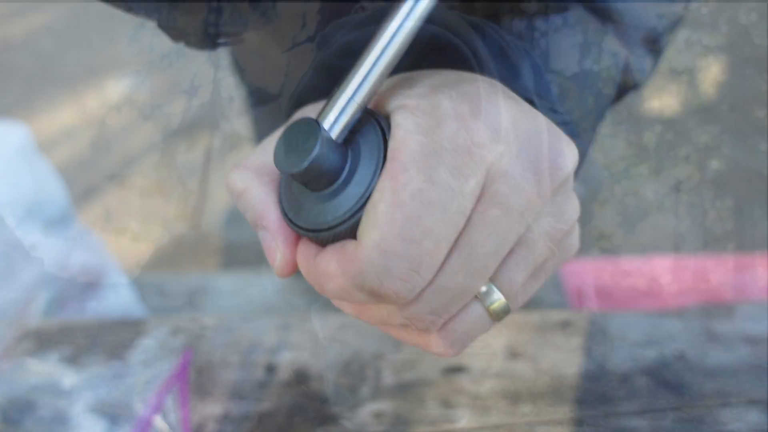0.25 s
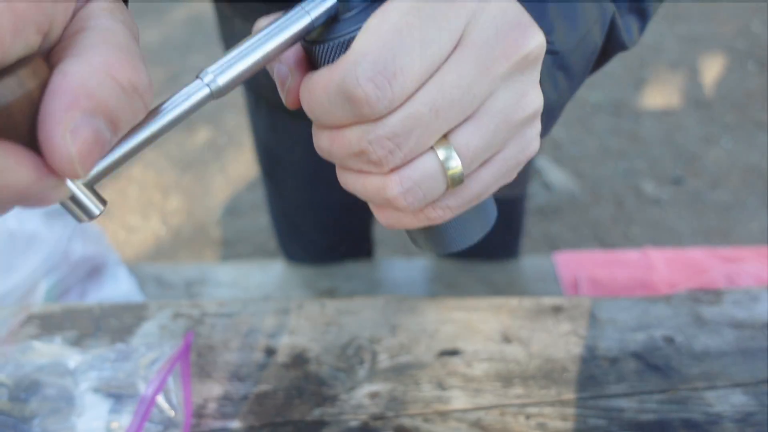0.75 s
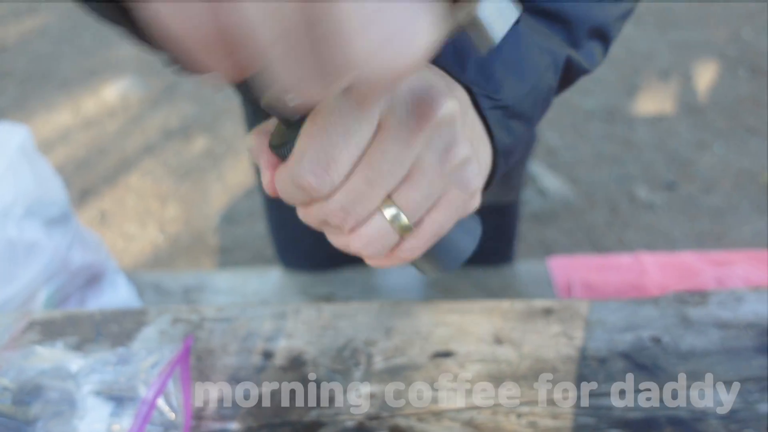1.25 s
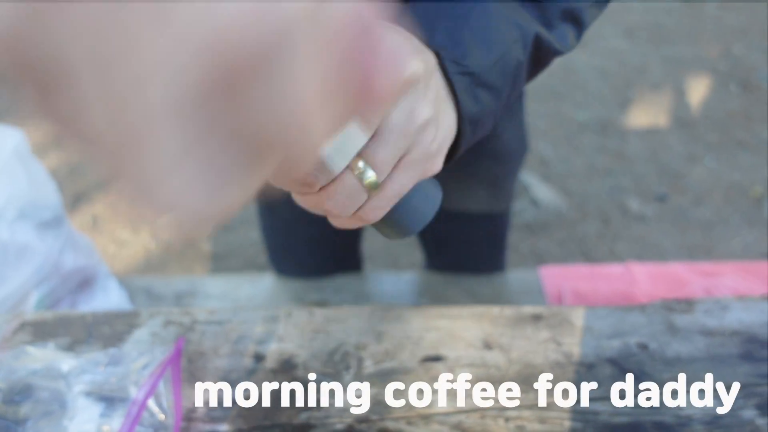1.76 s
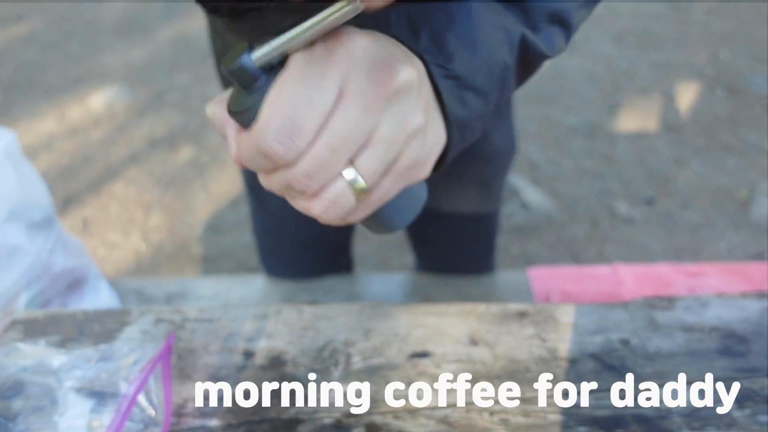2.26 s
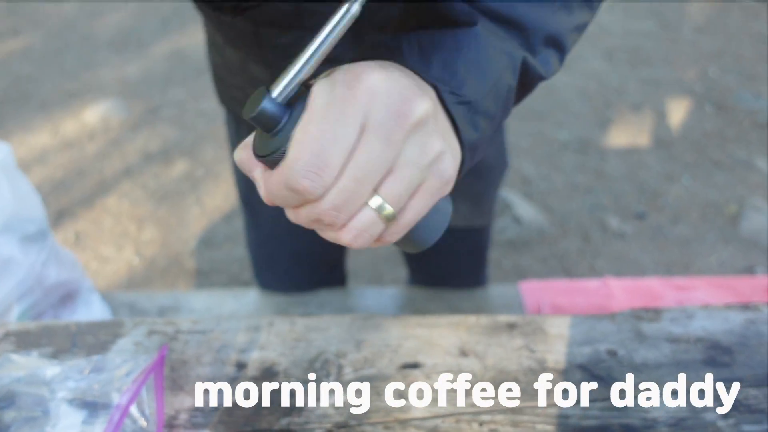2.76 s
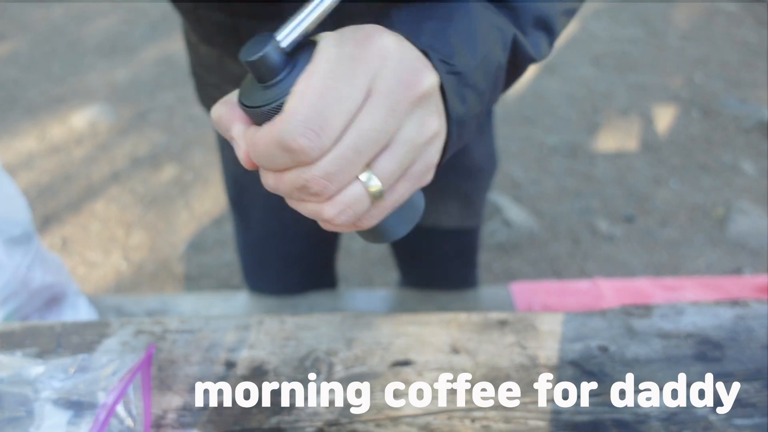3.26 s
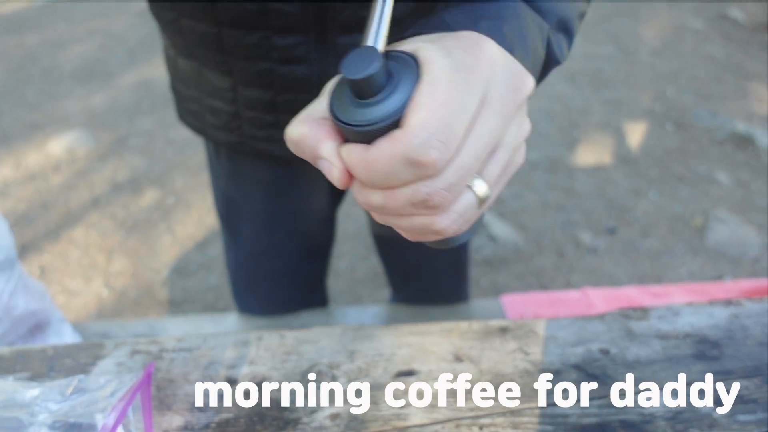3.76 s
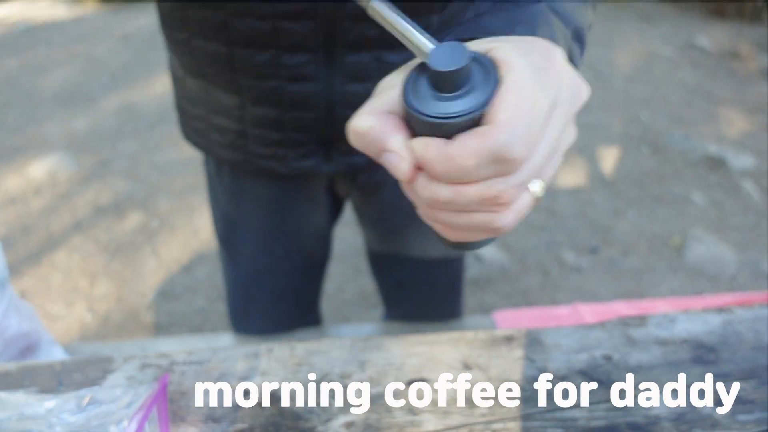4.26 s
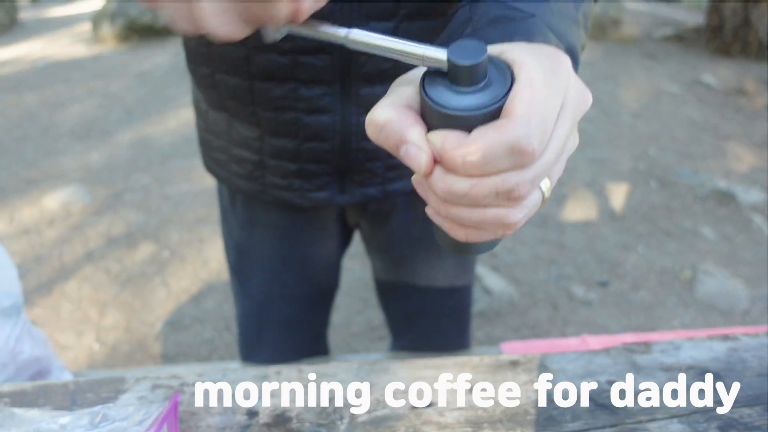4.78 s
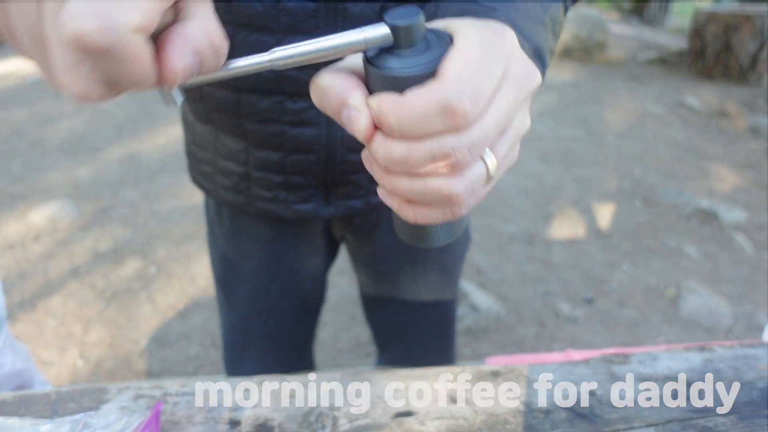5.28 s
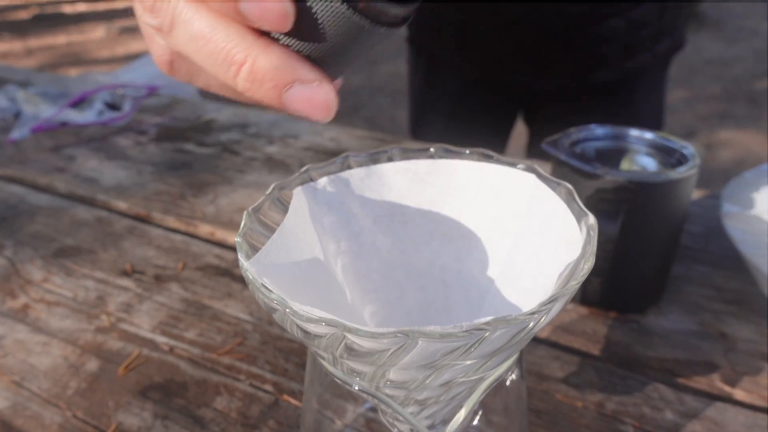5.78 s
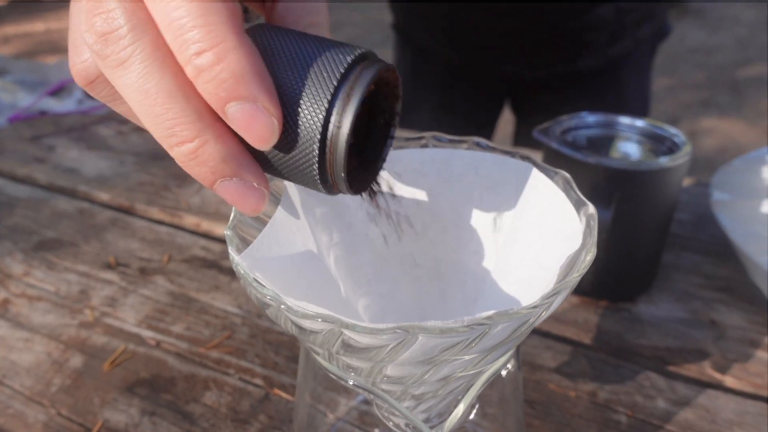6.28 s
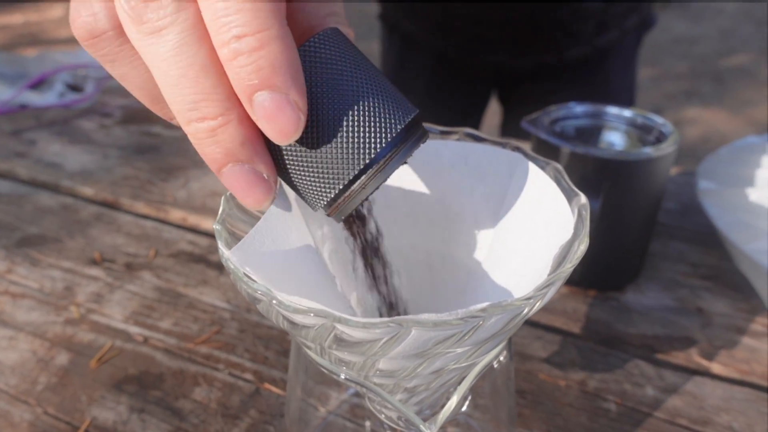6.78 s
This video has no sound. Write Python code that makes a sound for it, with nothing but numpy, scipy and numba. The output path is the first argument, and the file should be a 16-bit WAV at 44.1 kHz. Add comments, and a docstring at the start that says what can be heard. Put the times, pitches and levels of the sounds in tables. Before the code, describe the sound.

Close outdoor stereo sound over very faint hiss and a distant low hum. From 0 to 0.85 seconds a hand coffee grinder catches in two uneven crunching spells, weak then much stronger, fading to a short near-pause, while a songbird gives quick sliding whistles that echo among trees. From 0.85 to 5.5 seconds grinding is continuous: dry grit rasps and irregular bean cracks snap many times a second, ringing a small metal body mostly around 2 kHz with brighter scraping above. Its colour and low thud swing roughly every half second with the crank. At 5.53 it cuts off dead. Only soft air and rapid, slightly hoarse falling and rising bird chirps remain. At 6.34 a small tap begins a soft papery rush of grounds into a filter, strongest until 6.6, then thinning into scattered ticks and near silence by 7 seconds.

```python
"""A hand-cranked coffee grinder close by in a forest: grit and cracking beans ring its metal body,
whose colour swings with each turn of the crank; a songbird whistles at the start among echoing trees.
The grinder's sound is cut off at 5.53 s as the scene changes; the bird is back, gliding sines with a
hoarse flutter. From 6.3 s a stream of random grains, coffee grounds, patters into a paper filter.
Faint hiss and a far hum of filtered noise lie under all of it."""
import sys
import numpy as np
from scipy import signal
from scipy.fft import rfft, irfft
from scipy.io import wavfile
from scipy.ndimage import uniform_filter1d
from numba import njit

SR = 44100
rng = np.random.default_rng(int(sys.argv[2]) if len(sys.argv) > 2 else 0)


def store_pcm(level_fs):
    """Save levels as 16-bit WAV."""
    pcm = np.round(np.clip(level_fs, -1, 1) * 32767).astype(np.int16)
    wavfile.write(sys.argv[1], SR, np.atleast_2d(pcm).T)


N = 309802
T = np.arange(N) / SR

# grinding level, one list per spell: time_s, level_db
GRIND_SPELLS = [
    [(0, -41), (.012, -52), (.05, -50), (.058, -39), (.1, -40), (.13, -44), (.15, -40.5), (.24, -46.5),
     (.29, -38), (.305, -51), (.335, -62)],
    [(.335, -42.5), (.395, -43), (.403, -36), (.45, -29), (.57, -27.5), (.61, -24.5), (.655, -32),
     (.668, -37), (.7, -52.5), (.76, -55.5), (.84, -61)],
    [(0.854, -41), (0.875, -39.5), (0.92, -30.5), (0.995, -33), (1.07, -32), (1.145, -31.5), (1.22, -33.5),
     (1.295, -36), (1.37, -28), (1.445, -29), (1.52, -31.5), (1.595, -33), (1.67, -30), (1.745, -31.5),
     (1.82, -33), (1.895, -27.5), (1.97, -29.5), (2.045, -31), (2.12, -31), (2.195, -33), (2.27, -29),
     (2.345, -34), (2.42, -31.5), (2.495, -30), (2.57, -30), (2.645, -32.5), (2.72, -32.5), (2.795, -33),
     (2.87, -32), (2.945, -29.5), (3.02, -32), (3.095, -33), (3.17, -29.5), (3.245, -31.5), (3.32, -31),
     (3.395, -29), (3.47, -32), (3.545, -28), (3.62, -33), (3.695, -35), (3.77, -35), (3.845, -33),
     (3.92, -33.5), (3.995, -30.5), (4.07, -30), (4.145, -31), (4.22, -28), (4.295, -31.5), (4.37, -33.5),
     (4.445, -37), (4.52, -31.5), (4.595, -32), (4.67, -30.5), (4.745, -31.5), (4.82, -33.5), (4.895, -31),
     (4.97, -33), (5.045, -30.5), (5.12, -32.5), (5.195, -30), (5.27, -31), (5.345, -31.5), (5.42, -30),
     (5.495, -36), (5.53, -35.5)],
]
# stream of grounds: time_s, level_db
POUR_LEVEL = [(6.335, -79), (6.349, -54), (6.369, -46.5), (6.40, -43.5), (6.47, -41.5), (6.531, -41),
              (6.565, -42.5), (6.587, -40), (6.603, -43), (6.625, -47.5), (6.66, -46.5), (6.69, -49.5),
              (6.76, -50), (6.84, -53), (6.903, -58), (6.915, -60), (6.967, -68), (7.02, -70)]


def undb(db):
    """Decibels to an amplitude factor."""
    return 10 ** (np.asarray(db) / 20)


def unit(x):
    """Scale to rms 1."""
    return x / np.sqrt(np.mean(x ** 2))


@njit
def svf(x, hz, width_hz):
    """State-variable band-pass with a moving centre, gain 1 at the centre."""
    y, band, low = np.empty(len(x)), 0., 0.
    for i in range(len(x)):
        g = np.tan(np.pi * hz[i] / SR)
        k = width_hz / hz[i]
        v = (band + g * (x[i] - low)) / (1 + g * (g + k))
        band, low = 2 * v - band, low + 2 * g * v
        y[i] = k * v
    return y


def band_pass(x, hz, width_hz):
    """State-variable band-pass with a fixed centre."""
    return svf(x, np.full(N, 1. * hz), 1. * width_hz)


def ring(x, hz, width_hz):
    """Resonance of two cascaded band-passes; white noise of rms 1 leaves it near rms 1."""
    hz = hz + np.zeros(N)
    narrow = svf(x, hz, 1. * width_hz)
    return svf(narrow, hz, 2.06 * width_hz) * np.sqrt(SR / (1.177 * width_hz))


def body(x, modes):
    """Parallel resonances, neighbours in opposite polarity."""
    return sum((-1) ** k * undb(db) * ring(x, hz, width_hz) for k, (hz, width_hz, db) in enumerate(modes))


def tone(x, curve, width_hz):
    """A resonance whose pitch and strength move along a curve."""
    time_s, hz, db = np.transpose(curve)
    return undb(np.interp(T, time_s, db)) * ring(x, np.interp(T, time_s, hz), width_hz)


def walk(rate_hz):
    """Random levels, one every 1 / rate_hz seconds, slewed; spread near 1."""
    hold = int(SR / rate_hz)
    steps = np.repeat(rng.standard_normal(N // hold + 1), hold)
    return 1.05 * uniform_filter1d(steps, hold)[:N]


def grains(per_ms, spread_db, clump_db):
    """Random clicks of uneven size with clumped levels; the denser, the smaller, for rms 1."""
    chance = np.clip(per_ms, .05, 20) * 1000 / SR
    size_db = spread_db * np.minimum(rng.exponential(size=N), 4) + clump_db * walk(60)
    size = undb(size_db) * rng.standard_normal(N)
    return (rng.random(N) < chance) * unit(size) / np.sqrt(chance)


def bursts(times_s, levels_db, decay_s, click=0.87):
    """A sharp click trailed by a short, exponentially decaying crunch at each time."""
    out, k = np.zeros(N + 512), np.arange(512)
    noises = rng.standard_normal((len(times_s), 512))
    for s, db, noise in zip(times_s, levels_db, noises):
        noise[0] = click
        crunch = noise * np.exp(-k / (decay_s * SR))
        # equal energy whatever the decay
        out[int(s * SR) + k] += undb(db) * crunch * np.sqrt(0.0016 * SR) / np.linalg.norm(crunch)
    return out[:N]


def tail(x, t60_s):
    """Scattered echoes, decaying noise unrelated left and right."""
    t = T[:int(t60_s * SR)]
    echo = rng.standard_normal((2, len(t))) * 1000 ** (-t / t60_s)
    echo /= np.sqrt(np.sum(echo ** 2) / 2)
    return signal.fftconvolve(x[None], echo, axes=1)[:, :N]


def grinder():
    """Grit and snapping beans ring the same body; each crank turn swings the resonances' shares."""
    # snapping beans: time_s, knock_db, hollow_db, shell_db, burr_db, edge_db, hollow_pitch_hz
    snaps = [(0.055, -48, -29.5, -38, -24.5, -43, 2310), (0.0733, -41.5, -30, -25, -24, -33, 2070),
             (0.0768, -30.5, -28, -30, -25, -34, 2080), (0.0895, -47, -30, -36, -33, -44, 2270),
             (0.0994, -52, -31, -27, -29, -33, 2100), (0.1103, -49, -36, -45, -27, -37, 2200),
             (0.121, -40, -26.5, -30, -25, -39, 2030), (0.128, -35, -25.5, -27, -21.5, -39, 2140),
             (0.1606, -44, -32, -35, -26, -41, 2100), (0.174, -34, -37, -29, -31, -40, 2030),
             (0.2013, -44, -31, -29, -29, -38, 2050), (0.2203, -48, -36, -40, -40, -40, 2100),
             (0.2355, -45, -47, -51, -30, -48, 1420), (0.2478, -34, -30, -32, -29, -39, 2160),
             (0.258, -40, -37, -37, -30, -46, 2150), (0.2709, -51, -33, -34, -30, -49, 2010),
             (0.285, -47, -44, -36, -37, -51, 2130), (0.2997, -49, -49, -41, -38, -51, 1420),
             (0.337, -50, -46, -45, -44, -58, 2410), (0.3632, -33, -23.5, -28, -23.5, -43, 2100),
             (0.4052, -32, -19, -27, -22.5, -30, 2030), (0.4148, -33, -36, -33, -27, -50, 2110),
             (0.43, -45, -26, -30, -23, -47, 1880), (0.4538, -35, -41, -36, -23, -47, 2420),
             (0.4699, -22.5, -20, -21, -20, -41, 2630), (0.4833, -24.5, -24, -25, -23, -29, 2070),
             (0.504, -38, -26, -26, -26, -30, 1990), (0.544, -20, -37, -37, -40, -43, 1990),
             (0.5853, -28, -23, -21, -22, -39, 2580), (0.5975, -39, -19, -21, -20, -35, 2600),
             (0.6555, -48, -24, -20.5, -22, -29, 2610), (0.717, -70, -66, -60, -52, -45, 2000),
             (0.8556, -42, -31, -27.5, -22.5, -38, 1980), (0.874, -42, -25, -29, -24.5, -46, 1950),
             (0.8905, -43, -31, -32, -27, -46, 1760), (0.9014, -30, -28, -23.5, -21.5, -45, 2090),
             (0.9087, -46, -24.5, -30, -23, -39, 1840), (0.9285, -49, -44, -33, -25, -44, 2100),
             (0.951, -32, -25.5, -41, -33, -49, 1840), (0.959, -32, -27, -25, -25, -30, 1850),
             (1.0061, -47, -39, -44, -38, -41, 1880), (1.02, -47, -46, -33, -31, -46, 1920),
             (1.053, -49, -33, -28, -22.5, -40, 2690), (1.061, -47, -41, -27, -27, -48, 1950),
             (1.0682, -43, -36, -40, -26, -50, 1410), (1.0904, -40, -35, -23, -31, -32, 2690),
             (1.1015, -39, -41, -20, -28, -28, 2640), (1.138, -48, -37, -30, -30, -39, 2620),
             (1.175, -30.5, -36, -28, -42, -56, 2100), (1.2026, -32, -30, -34, -31, -46, 1830),
             (1.2151, -29, -36, -21, -31, -35, 2590), (1.2225, -34, -42, -31, -36, -48, 1550),
             (1.262, -45, -37, -34, -33, -51, 2000), (1.2828, -30, -34, -39, -23.5, -52, 1740),
             (1.2912, -47, -36, -45, -36, -56, 1730), (1.319, -43, -41, -47, -32, -50, 1450),
             (1.341, -26, -42, -41, -27, -53, 1420), (1.3872, -36, -30, -21.5, -29, -46, 2560),
             (1.4195, -39, -24.5, -27, -25, -40, 1660), (1.504, -37, -34, -28, -33, -40, 1870),
             (1.5352, -30, -37, -28, -23, -36, 1810), (1.6226, -44, -30, -43, -38, -55, 1870),
             (1.671, -47, -22, -34, -32, -43, 2050), (1.688, -27.5, -21, -32, -36, -33, 2000),
             (1.7066, -26, -32, -41, -33, -43, 2140), (1.756, -33, -29, -46, -40, -53, 2020),
             (1.781, -32, -31, -45, -42, -55, 2170), (1.809, -43, -22.5, -37, -27, -35, 2040),
             (1.8163, -45, -23, -43, -40, -52, 2070), (1.824, -25.5, -36, -36, -22, -43, 1860),
             (1.855, -45, -14, -24, -22, -29, 2060), (1.8678, -33, -24, -25, -29, -48, 2060),
             (1.8763, -42, -35, -22.5, -36, -47, 1960), (1.9026, -36, -23, -34, -21, -35, 2000),
             (1.91, -31, -25, -23.5, -24, -44, 1820), (1.9258, -39, -21, -25, -24, -49, 1910),
             (1.9703, -37, -27, -35, -36, -26.5, 1850), (2.0084, -29, -28, -29, -30, -39, 1780),
             (2.018, -41, -34, -32, -27, -46, 1750), (2.0616, -47, -27, -25, -30, -31, 2560),
             (2.0709, -40, -22.5, -25, -23, -26, 1820), (2.0856, -39, -28, -24, -20, -48, 1560),
             (2.1137, -36, -45, -24, -26, -41, 1490), (2.139, -46, -34, -25, -22.5, -38, 1860),
             (2.1966, -46, -41, -44, -28, -44, 1890), (2.2281, -32, -32, -24.5, -36, -45, 2670),
             (2.264, -40, -35, -28, -28, -37, 2300), (2.2926, -38, -33, -42, -28, -40, 1690),
             (2.3234, -32, -22.5, -29, -21, -31, 1720), (2.338, -28, -24, -31, -24, -43, 1680),
             (2.3858, -30, -36, -39, -29, -42, 1650), (2.4558, -24.5, -23, -23.5, -23, -32, 1610),
             (2.469, -32, -24, -20.5, -26, -30, 2120), (2.4978, -49, -43, -34, -33, -45, 1660),
             (2.5278, -38, -48, -28, -26, -43, 1870), (2.5704, -32, -31, -38, -33, -52, 1730),
             (2.6263, -40, -29, -27, -40, -39, 1890), (2.6368, -28, -28, -21, -19.5, -28, 1840),
             (2.6503, -38, -26.5, -26, -35, -44, 1850), (2.684, -48, -41, -32, -30, -33, 2130),
             (2.7089, -41, -38, -40, -34, -51, 1720), (2.7256, -45, -39, -40, -31, -52, 1600),
             (2.7408, -29.5, -24, -25, -26.5, -44, 2140), (2.7497, -40, -31, -44, -28, -54, 2060),
             (2.782, -51, -33, -45, -37, -54, 2010), (2.8143, -29, -22, -25, -24, -30, 2160),
             (2.8296, -28, -31, -25, -29, -44, 2270), (2.8501, -34, -25, -28, -22, -32, 2080),
             (2.9344, -47, -37, -35, -21, -47, 1880), (2.9516, -50, -20, -30, -35, -31, 2580),
             (2.9764, -22.5, -13.5, -20.5, -20, -32, 2100), (2.9859, -34, -32, -32, -35, -47, 1440),
             (3.0263, -38, -26, -44, -27, -48, 1820), (3.0385, -40, -32, -45, -26, -44, 1440),
             (3.0573, -37, -39, -38, -29, -34, 2280), (3.0761, -49, -44, -42, -32, -45, 1440),
             (3.0848, -42, -29, -33, -23, -29, 2650), (3.112, -29.5, -33, -33, -26, -35, 1750),
             (3.1546, -39, -33, -26, -28, -41, 2640), (3.1677, -48, -24, -20, -25, -42, 2000),
             (3.187, -44, -24, -17, -20.5, -44, 1990), (3.1998, -41, -30, -23, -25, -41, 2260),
             (3.231, -45, -33, -30, -24, -43, 1950), (3.2615, -45, -41, -32, -34, -46, 2080),
             (3.2855, -26.5, -24, -23.5, -33, -35, 2460), (3.306, -42, -32, -41, -36, -38, 2620),
             (3.314, -44, -33, -33, -24, -51, 2520), (3.377, -31, -33, -33, -32, -43, 1720),
             (3.4312, -30, -38, -47, -27, -46, 2030), (3.4808, -40, -26, -41, -38, -43, 1910),
             (3.5376, -29, -18, -21, -22, -25, 1760), (3.546, -36, -20, -20, -18, -34, 1480),
             (3.553, -35, -28, -28, -22, -41, 1910), (3.5873, -37, -32, -36, -25, -35, 1730),
             (3.598, -44, -35, -38, -29, -35, 1800), (3.6247, -45, -26.5, -29, -30, -32, 1860),
             (3.662, -33, -29, -41, -26, -44, 1750), (3.6853, -50, -26.5, -31, -28, -44, 2050),
             (3.698, -39, -30, -29, -31, -44, 2100), (3.7152, -35, -24, -27, -22.5, -45, 2030),
             (3.7527, -34, -28, -26, -28, -37, 2040), (3.7664, -32, -28, -28, -23.5, -39, 1770),
             (3.7842, -33, -29, -44, -28, -35, 2040), (3.812, -50, -31, -37, -34, -52, 2420),
             (3.8257, -40, -28, -31, -31, -44, 1820), (3.8437, -40, -27, -29, -28, -44, 2480),
             (3.8533, -39, -26, -30, -22, -43, 1950), (3.873, -45, -38, -43, -31, -51, 1730),
             (3.9157, -28, -26, -24, -24, -40, 1800), (3.959, -36, -29, -39, -34, -38, 2000),
             (3.99, -31, -19, -42, -24, -36, 2260), (4.011, -33, -19.5, -43, -36, -50, 2310),
             (4.0646, -36, -20, -33, -34, -34, 2310), (4.1055, -31, -20, -32, -24, -46, 2250),
             (4.1216, -38, -15.5, -20.5, -23, -29, 2080), (4.159, -47, -35, -44, -40, -44, 1800),
             (4.1886, -35, -30, -43, -26, -37, 2170), (4.2304, -46, -25, -37, -26, -48, 2240),
             (4.239, -42, -21, -30, -22, -29.5, 2250), (4.2613, -31, -39, -36, -30, -46, 1840),
             (4.273, -42, -29, -29.5, -24.5, -32, 1740), (4.3302, -40, -36, -36, -26.5, -46, 1690),
             (4.346, -33, -39, -41, -25, -36, 1480), (4.3602, -44, -25, -26.5, -26, -37, 2370),
             (4.3699, -52, -44, -33, -27, -50, 2070), (4.3851, -45, -26, -33, -30, -37, 2370),
             (4.403, -32, -28, -44, -26, -49, 1720), (4.4175, -30, -36, -29, -33, -40, 2510),
             (4.4315, -37, -25, -35, -29, -41, 1450), (4.489, -47, -31, -32, -27, -34, 1960),
             (4.508, -46, -23, -36, -31, -37, 2420), (4.5244, -32, -19, -30, -26, -36, 1760),
             (4.538, -45, -24, -43, -42, -46, 1890), (4.547, -39, -26, -43, -28, -44, 2270),
             (4.5762, -40, -27, -36, -25, -43, 1480), (4.5934, -37, -27, -43, -34, -43, 2340),
             (4.6018, -28, -26, -36, -25, -43, 2360), (4.6355, -47, -26, -27, -30, -40, 1560),
             (4.664, -39, -18, -28, -28, -42, 2200), (4.679, -29, -25, -27, -31, -41, 2420),
             (4.689, -45, -16, -29, -24, -32, 2290), (4.706, -29, -25, -38, -31, -33, 2190),
             (4.7376, -47, -28, -40, -33, -42, 2160), (4.745, -35, -22, -30, -27, -38, 2300),
             (4.76, -37, -31, -40, -25, -49, 2220), (4.77, -29, -19, -26, -20.5, -34, 1610),
             (4.7774, -48, -26, -39, -31, -45, 2200), (4.821, -42, -41, -44, -31, -44, 1870),
             (4.8335, -50, -40, -45, -34, -51, 2000), (4.8446, -29, -32, -37, -28, -50, 2260),
             (4.8535, -47, -37, -40, -29, -44, 1870), (4.8666, -40, -24.5, -29, -30, -35, 2160),
             (4.9003, -49, -42, -30, -33, -36, 2400), (4.937, -42, -39, -39, -30, -50, 1860),
             (4.955, -42, -30, -36, -32, -42, 2060), (4.973, -44, -27, -34, -38, -48, 2400),
             (4.9896, -34, -26, -35, -38, -40, 2440), (5.002, -35, -23, -34, -36, -40, 1600),
             (5.01, -35, -22, -35, -29, -36, 2360), (5.0569, -28, -20.5, -36, -29, -33, 1840),
             (5.065, -45, -26, -40, -28, -42, 1900), (5.0772, -39, -27, -38, -29, -38, 2100),
             (5.083, -27, -29, -43, -31, -39, 2280), (5.1248, -29, -19, -39, -27, -40, 2200),
             (5.1601, -39, -28, -44, -31, -47, 2270), (5.167, -39, -23, -34, -24, -40, 2250),
             (5.1732, -31, -22, -32, -24, -36, 2370), (5.191, -25, -14.5, -25, -24, -39, 2330),
             (5.2065, -32, -13, -32, -20, -25, 2310), (5.2365, -46, -14.5, -18.5, -23, -24.5, 2230),
             (5.281, -32, -19, -34, -27, -34, 2190), (5.288, -43, -20.5, -36, -26, -32, 2190),
             (5.313, -34, -19, -25, -22, -29, 2200), (5.319, -37, -18, -32, -22.5, -28, 2210),
             (5.3518, -34, -23.5, -29, -32, -43, 1650), (5.3686, -40, -21.5, -32, -24, -33, 2170),
             (5.386, -38, -24, -38, -19, -38, 2130), (5.394, -41, -27, -31, -21, -36, 2390),
             (5.438, -45, -33, -30, -25, -43, 1960), (5.4813, -52, -34, -30.5, -39, -48, 2380),
             (5.5112, -46, -31, -35, -35, -51, 1980), (5.5273, -34, -26, -32, -40, -57, 2200)]
    # crank turns: hardest_push_s, thud_swell_db
    turns = [(-.12, 32), (.22, 2), (.55, -2), (1.3, 7.5), (1.802, 7), (2.38, 3), (2.93, 4), (3.45, 3),
             (4.0, 5.5), (4.52, 2.5), (5.08, 4.5), (5.6, 3)]
    # the hollow as grip and load shift: time_s, pitch_hz, grit_share_db
    hollow_shift = [(0.06, 2130, -5), (0.13, 2130, -4), (0.2, 2030, -2), (0.27, 2120, -8), (0.36, 2200, 0),
                    (0.42, 2010, -2), (0.5, 1960, -3.5), (0.58, 1980, -5.5), (0.66, 1940, -5),
                    (0.88, 1890, -7.5), (0.975, 1820, -7), (1.07, 1960, -8), (1.165, 1950, -7.5),
                    (1.26, 1940, -4), (1.355, 1830, -3), (1.45, 1920, -9), (1.545, 1930, -6),
                    (1.64, 2140, -5.5), (1.69, 2070, 1), (1.76, 2030, 0.5), (1.83, 2040, 1),
                    (1.925, 1840, 0), (2.02, 1790, -7), (2.115, 1860, -8.5), (2.21, 1890, -8.5),
                    (2.305, 1830, -6.5), (2.4, 1730, -4.5), (2.495, 1720, -9.5), (2.59, 1780, -6),
                    (2.685, 1880, -2.5), (2.78, 1990, -1), (2.875, 1990, -1), (2.97, 2000, -3),
                    (3.065, 1850, -8), (3.16, 1960, -6), (3.255, 1990, -6.5), (3.35, 1820, -2.5),
                    (3.445, 1930, -2.5), (3.54, 1850, -6), (3.635, 1730, -3.5), (3.73, 2010, -7),
                    (3.825, 1940, -3.5), (3.92, 1910, -2), (4.015, 1920, -0.5), (4.11, 2170, -1.5),
                    (4.205, 2040, -6), (4.3, 1980, -6), (4.395, 1870, -1.5), (4.49, 1990, 3),
                    (4.585, 2140, -2.5), (4.68, 2150, -2), (4.775, 1740, -5.5), (4.87, 2040, -4.5),
                    (4.965, 1760, 0), (5.06, 2020, 2.5), (5.155, 2170, -2), (5.25, 2180, 1),
                    (5.345, 2100, -4), (5.44, 1970, -2)]
    # grit share per resonance: mean_db, swing_db, lag_turns
    grit_share = {"thud": (-15.5, 0, 0.026), "knock": (-10, 1.4, -0.1), "hollow": (0, 0, -0.017),
                  "shell": (-9.5, -0.81, 0.014), "burr": (-2.78, -0.53, -0.033),
                  "edge": (-20.5, -1.4, 0.00014)}
    # level drift per resonance as the hopper empties: drift_db_per_s
    drift_db_per_s = {"thud": 0.05, "knock": 0.6, "hollow": 0, "shell": -0.57, "burr": -0.09, "edge": 1}
    # snap response per resonance: gain_db
    snap_gain_db = {"thud": -8, "knock": 0.44, "hollow": 1.15, "shell": 0.1, "burr": 0.74, "edge": 0.1}
    # first crack of a snap against its crunch, per resonance: size_ratio
    snap_click = {"thud": 1.5, "knock": 1.5, "hollow": 2.6, "shell": 2.2, "burr": 2.2, "edge": 1.7}
    # decay of the crunch per resonance: time_constant_s
    crunch_s = {"thud": .0026, "knock": .0035, "hollow": .0027, "shell": .0027, "burr": .0026, "edge":
                .0014}
    # low resonances of the body: pitch_hz, width_hz, level_db
    thud_modes = [(444.5, 334, -7), (617, 398, -2.5)]
    # knock resonances: pitch_hz, width_hz, level_db
    knock_modes = [(1270, 900, -5.5), (1660, 380, -15)]
    # tuned part of the knock, clearest while the crank starts up: time_s, pitch_hz, strength_db
    knock_tone = [(.05, 1220, -2), (.3, 1130, -1.5), (.5, 1120, -9), (.9, 1150, -8), (1.4, 1120, -6),
                  (1.9, 1160, -9), (2.4, 1120, -9), (2.9, 1060, -8), (3.4, 1060, -9.5), (3.9, 1070, -8.5),
                  (4.4, 1020, -9), (5.0, 1050, -11), (5.5, 980, -12)]
    # shell resonances: pitch_hz, width_hz, level_db
    shell_modes = [(2980, 1420, -7.5), (3708, 323, -4), (4480, 1310, -6)]
    # burr resonances: pitch_hz, width_hz, level_db
    burr_modes = [(5295, 1050, -5), (6930, 1020, -4), (8330, 2740, -9)]
    # brightest burr ring, wandering with the load: time_s, pitch_hz, strength_db
    burr_tone = [(0.05, 6600, -13), (0.12, 6130, -3.5), (0.23, 7100, -11), (0.34, 6230, -13),
                 (0.42, 6930, -14), (0.55, 6000, -9), (0.69, 6770, -16), (0.89, 6140, -7),
                 (0.95, 6700, -10), (1.1, 6300, 3), (1.15, 6590, -11), (1.26, 6000, -4), (1.33, 6900, -7),
                 (1.39, 6100, -7), (1.51, 6270, -13), (1.58, 6000, -6), (1.73, 6830, -11.5),
                 (2.23, 6150, -3), (2.29, 6740, -21), (2.48, 6430, -6), (2.52, 5950, -6), (2.84, 7100, -11),
                 (3.0, 6600, -8), (3.04, 6100, -3), (3.12, 6500, -8), (3.19, 5760, -9), (3.22, 6200, -11),
                 (3.45, 6800, -7), (3.5, 6300, -13), (3.62, 6530, -11), (3.82, 6070, -4),
                 (3.99, 6530, -3.5), (4.41, 6340, -10), (4.54, 6640, -8), (4.95, 6280, -5),
                 (5.12, 6840, -6), (5.21, 6400, -10), (5.36, 6650, -6.5), (5.53, 6300, -5)]
    # topmost resonances: pitch_hz, width_hz, level_db
    edge_modes = [(10000, 2650, 4.5), (13480, 3300, -36)]

    level_db = np.interp(T, *np.vstack(GRIND_SPELLS).T)
    turning = sum((T >= spell[0][0]) & (T < spell[-1][0]) for spell in GRIND_SPELLS)
    push_s, swell_db = np.transpose(turns)
    turn = np.interp(T, push_s, np.arange(len(turns)))
    grit = grains(3.5, spread_db=1.0, clump_db=1.2) * turning
    snap_s, knock_db, hollow_db, shell_db, burr_db, edge_db, snap_hz = np.transpose(snaps)
    shift_s, hollow_hz, share_db = np.transpose(hollow_shift)

    def rub(part, extra_db=0, swell_db=0):
        """Grit and hiss of the burrs as they drive one resonance, swinging with the crank."""
        mean_db, swing_db, lag_turns = grit_share[part]
        drift_db = drift_db_per_s[part] * (T - push_s.mean())
        crank_db = (swing_db + swell_db) * np.cos(2 * np.pi * (turn - lag_turns))
        part_db = mean_db + extra_db + drift_db + crank_db
        own = grit * undb(2.0 * walk(400)) + 0.64 * rng.standard_normal(N) * turning
        return undb(level_db + part_db - 0.72 + 1.56 * walk(24.964)) * own

    def snap(part, db):
        """Cracks of the beans as they drive one resonance."""
        return bursts(snap_s, db + snap_gain_db[part], crunch_s[part], click=snap_click[part])

    def hollow(x, hz, core_db):
        """Broad resonance with a narrow core at the same pitch."""
        return undb(-6.0) * ring(x, hz, 880) + undb(core_db) * ring(x, hz, 184)

    thud = rub("thud", swell_db=np.interp(T, push_s, swell_db)) + snap("thud", knock_db)
    knock = rub("knock") + snap("knock", knock_db)
    burr = rub("burr") + snap("burr", burr_db)
    hollow_grit = rub("hollow", np.interp(T, shift_s, share_db))
    latest_snap_hz = snap_hz[np.searchsorted(snap_s, T, "right") - 1]

    sound = body(thud, thud_modes)
    sound += body(knock, knock_modes) + tone(knock, knock_tone, width_hz=228)
    sound -= hollow(hollow_grit, np.interp(T, shift_s, hollow_hz), core_db=-13.5)
    # a snap rings the core harder than grit does
    sound -= hollow(snap("hollow", hollow_db), latest_snap_hz, core_db=-9.5)
    sound += body(rub("shell") + snap("shell", shell_db), shell_modes)
    sound += undb(-3.5) * (body(burr, burr_modes) - tone(burr, burr_tone, width_hz=920))
    return sound + undb(-7.0) * body(rub("edge") + snap("edge", edge_db), edge_modes)


def bumps():
    """Dull blows of hand, crank and cup, each a burst on one resonance."""
    # time_s, level_db, pitch_hz, width_hz
    blows = [(.668, -42, 726, 110), (0.678, -43, 644, 100), (0.688, -46.5, 574, 100), (2.385, -46, 209, 40),
             (5.10, -48, 160, 40.2), (6.347, -41, 1490, 119)]
    return sum(ring(bursts([s], [db], decay_s=0.0041), hz, width_hz) for s, db, hz, width_hz in blows)


def scatter(near):
    """Table and ground throw back short echoes that differ between the ears and shift as hands move."""
    # colour of the scatter: pitch_hz, width_hz, level_db
    bands = [(344, 350, -12), (1500, 9300, -31.5), (7550, 11000, -23), (12200, 6300, -9)]
    coloured = sum(undb(db) * band_pass(near, hz, width_hz) for hz, width_hz, db in bands)
    ear_db = np.array([[-1.2], [1.2]])
    return undb(4.5) * tail(coloured * walk(15), t60_s=0.055) * undb(ear_db)


def pour():
    """A stream of grounds patters on paper and rings the cone, sparser as it weakens; coarse grains tick."""
    # coarse grains on paper: time_s, level_db
    coarse = [(6.3563, -39), (6.385, -28), (6.6696, -38), (6.696, -37), (6.7225, -39), (6.7405, -41),
              (6.755, -38), (6.7688, -32), (6.784, -33), (6.797, -32), (6.825, -36), (6.835, -35),
              (6.85, -42), (6.8661, -38), (6.874, -37), (6.892, -34), (6.903, -39), (6.932, -41),
              (6.974, -40.5), (7.013, -51)]
    # paper resonances: pitch_hz, width_hz, level_db
    paper_modes = [(2800, 1140, -1.5), (3900, 800, -0.5), (5230, 2700, -0.5), (7940, 2900, -0.5),
                   (11200, 4300, -10)]
    # air in the filter cone: pitch_hz, width_hz, level_db
    cone_modes = [(366, 140, -16.5), (1070, 370, -3.5)]

    tick_s, tick_db = np.transpose(coarse)
    level_db = np.interp(T, *np.transpose(POUR_LEVEL))
    lost_db = level_db.max() - level_db
    per_ms = 8 * undb(-0.3 * 2 * lost_db)
    stream = undb(level_db) * (T >= POUR_LEVEL[0][0]) * grains(per_ms, spread_db=-0.5, clump_db=1.6)
    ticks = bursts(tick_s, tick_db - 9.5, decay_s=0.0013)
    paper = body(stream, paper_modes)
    paper += body(ticks, paper_modes[:2]) + undb(-2) * body(ticks, paper_modes[2:])
    # the cone fades less than the stream does
    cone = body(undb(-8 + 0.15 * lost_db) * stream, cone_modes)
    return undb(-5.5) * paper + cone


def bird():
    """Gliding, hoarse whistles with short echoes of branches and long, band-passed ones of trunks."""
    # notes per phrase: after_s, length_s, from_hz, to_hz, from_db, to_db, arch_above_glide_hz
    phrases = { "fall": [(-.003, 0.013, 5750, 5120, -14, -6, 40), (.005, 0.022, 5250, 3300, -9, 3, 60),
               (.030, 0.0125, 3050, 3930, -9, -3, 120), (.039, 0.027, 3980, 2430, 3.5, -5.5, 40)],
               "rise": [(-.002, 0.0077, 2620, 2560, -7, -8, 10), (.006, 0.007, 2600, 2500, -1, 0, 10),
               (.014, 0.02, 2400, 3180, -7.5, 3.5, 230), (.059, 0.020, 3740, 2410, -2, -7, 60),
               (.082, 0.031, 3560, 4300, -9, -1.5, 150)],
               "held": [(0.0012, 0.039, 4540, 4430, 6.5, -13, 20), (0.003, 0.043, 4200, 4020, -2, -10, 20)],
               "thin": [(0, 0.195, 7600, 7500, 2, .1, 5), (.19, 0.078, 7520, 7400, -6.5, -6, 5)], }
    # start_s, phrase, level_db
    song = [(.006, "fall", -41), (0.100, "rise", -40), (0.247, "rise", -40.5), (.394, "rise", -41),
            (0.541, "rise", -40), (5.527, "held", -48), (5.576, "fall", -41), (5.679, "fall", -41),
            (5.782, "fall", -41), (5.885, "fall", -42.5), (5.906, "thin", -74), (5.989, "fall", -42.5),
            (6.087, "rise", -41.5), (6.235, "rise", -41.5), (6.383, "rise", -41), (6.529, "rise", -61)]
    # flutter share of the amplitude per phrase: hoarseness (0-1)
    hoarseness = {"fall": 0.24, "rise": 0.2, "held": 1, "thin": 1}

    # "held" is the hoarse, fading echo of an earlier whistle: call it so
    for table in (phrases, hoarseness):
        table["echo"] = table.pop("held")
    song = [(start_s, phrase.replace("held", "echo"), level_db) for start_s, phrase, level_db in song]

    edge_s = 0.0036
    out, flutter = np.zeros(N), walk(600)
    for start_s, phrase, level_db in song:
        hoarse = np.clip(hoarseness[phrase], 0, 1)
        for after_s, length_s, from_hz, to_hz, from_db, to_db, arch_hz in phrases[phrase]:
            note_s = start_s + after_s
            i = np.arange(int(note_s * SR), int((note_s + length_s) * SR))
            t = T[i] - T[i[0]]
            along = t / length_s
            hz = from_hz + (to_hz - from_hz) * along + arch_hz * np.sin(np.pi * along)
            phase = 2 * np.pi * np.cumsum(hz) / SR
            edges = np.clip(np.minimum(t, length_s - t) / edge_s, 0, 1) ** 2
            loudness = np.sqrt(2) * undb(level_db + from_db + (to_db - from_db) * along) * edges
            out[i] += loudness * (1 - hoarse + hoarse * flutter[i]) * np.sin(phase)
    bright = band_pass(out, 4950, 1300)
    branches = undb(-3.5) * tail(out, t60_s=0.079)
    trunks = undb(3.5) * tail(bright, t60_s=1.2)
    return out + branches + trunks


def hiss():
    """Shaped noise, wide in the treble, plus a faint treble haze among the trees."""
    # relative spectrum of the hiss: pitch_hz, density_db
    spectrum = [(40, -2), (103, -2), (294, -12.5), (778, -12.5), (1190, -12), (1410, -3), (2160, -12.5),
                (4000, -10), (5860, -22.5), (7500, -21.5), (15500, -26)]
    # haze: time_s, level_db
    haze_level = [(5.53, -66.5), (5.85, -64), (6.2, -82)]

    f = np.maximum(np.arange(N // 2 + 1) * SR / N, 1)
    spectrum_hz, density_db = np.transpose(spectrum)
    shape = undb(np.interp(np.log(f), np.log(spectrum_hz), density_db))
    mid, side = rfft(rng.standard_normal((2, N))) * shape
    wide = np.clip(f / 600, .4, 1) * np.array([[1], [-1]])
    out = undb(-58.5) * unit(irfft(mid + wide * side, N))
    haze = np.array([ring(rng.standard_normal(N), 6100, 2700) for _ in range(2)])
    return out + undb(np.interp(T, *np.transpose(haze_level))) * (T > haze_level[0][0]) * haze


def hum():
    """Far, wavering hum of narrow noise bands, nearly alike on both sides."""
    # bands: pitch_hz, width_hz
    hum_lines = [(105, 18), (150, 17), (195, 9)]
    # time_s, lowest_line_db, upper_lines_db
    hum_level = [(0, -59, -67.5), (.3, -71, -69), (.42, -64, -81), (1.05, -75.5, -88), (1.4, -69, -77),
                 (2.3, -68, -98), (3.1, -73.5, -80), (5.099, -70.5, -79.5), (5.9, -73.5, -86),
                 (7.02, -78, -85)]

    out = np.zeros((2, N))
    time_s, low_db, upper_db = np.transpose(hum_level)
    ear_db, sign = np.array([[-1.4], [1.4]]), np.array([[1], [-1]])
    for (hz, width_hz), db in zip(hum_lines, (low_db, upper_db, upper_db)):
        mid, side = (ring(rng.standard_normal(N), hz, width_hz) for _ in range(2))
        out += undb(np.interp(T, time_s, db) + ear_db) * (mid + 0.38 * side * sign)
    return out


def scene():
    """Grinder, bumps and their scatter, cut off from the last spell to the pour; grounds, bird and air."""
    # a little more top in the left ear: pitch_hz, width_hz, level_db
    left_sheen = (12700, 5200, -7.5)

    near = grinder() + bumps()
    grounds = pour()
    sounding = (T < GRIND_SPELLS[-1][-1][0]) | (T > POUR_LEVEL[0][0])
    close = (near + scatter(near)) * sounding
    sheen_hz, sheen_width_hz, sheen_db = left_sheen
    close[0] += undb(sheen_db) * band_pass(near, sheen_hz, sheen_width_hz) * sounding
    grounds_echo = undb(-26.0) * tail(grounds, t60_s=0.085)
    return close + grounds + grounds_echo + bird() + hiss() + hum()


def record(dry):
    """The microphone drops the deep bass and the recorder cuts the top."""
    bass_hz, top_hz = 70, 15850
    wet = signal.sosfilt(signal.butter(2, bass_hz, "high", fs=SR, output="sos"), dry)
    return signal.sosfilt(signal.ellip(10, .2, 80, top_hz, fs=SR, output="sos"), wet)


dry = scene()
out = record(dry)
store_pcm(out)
```